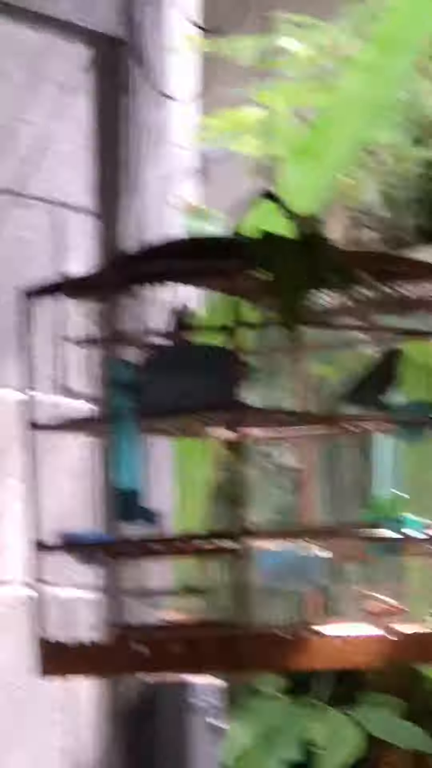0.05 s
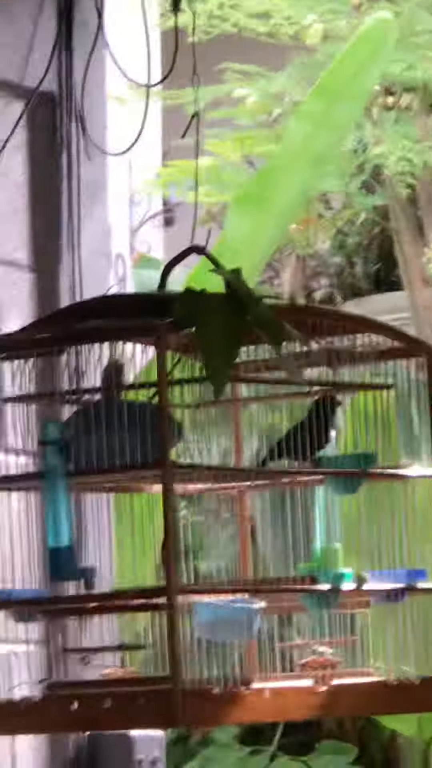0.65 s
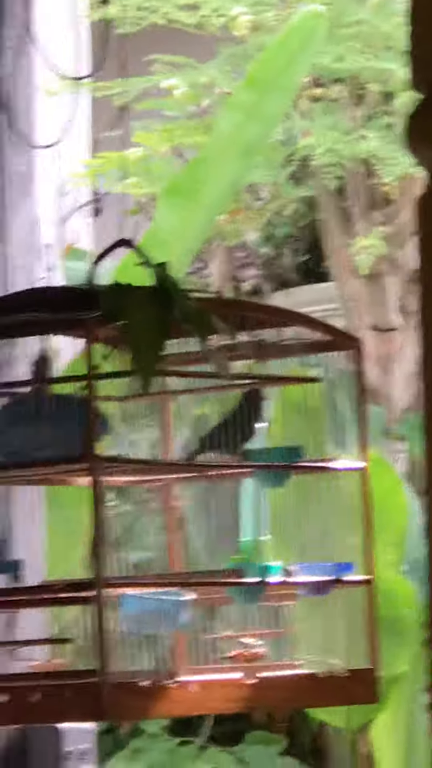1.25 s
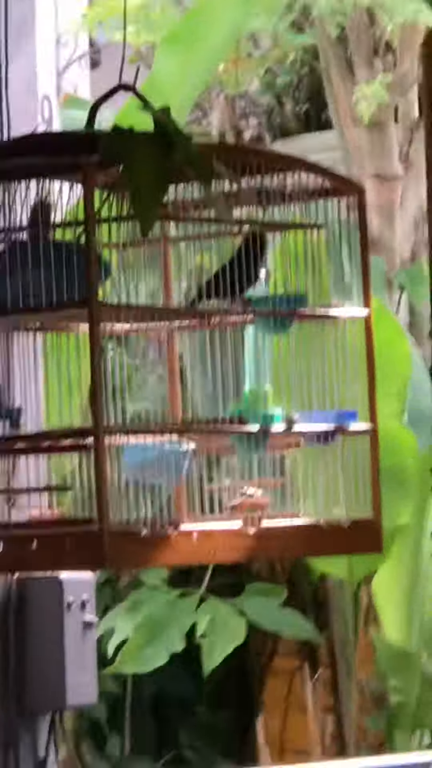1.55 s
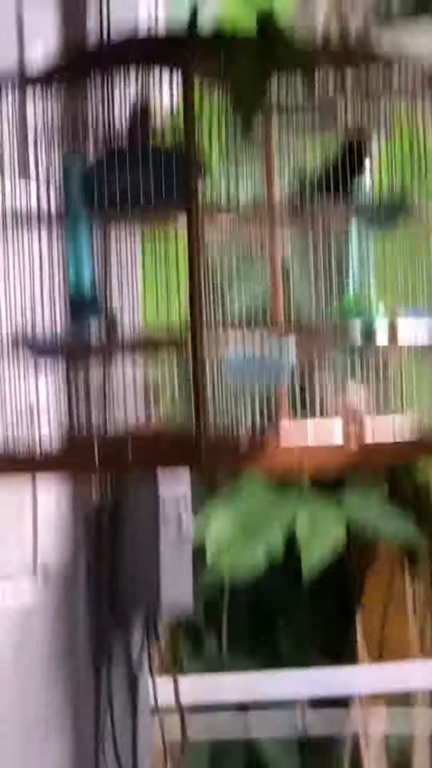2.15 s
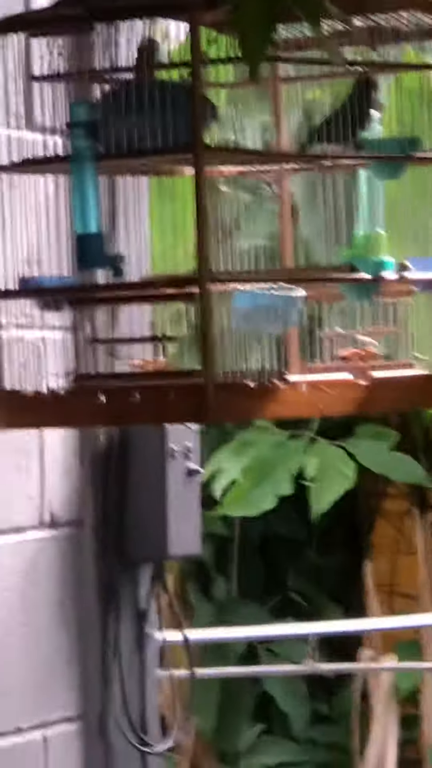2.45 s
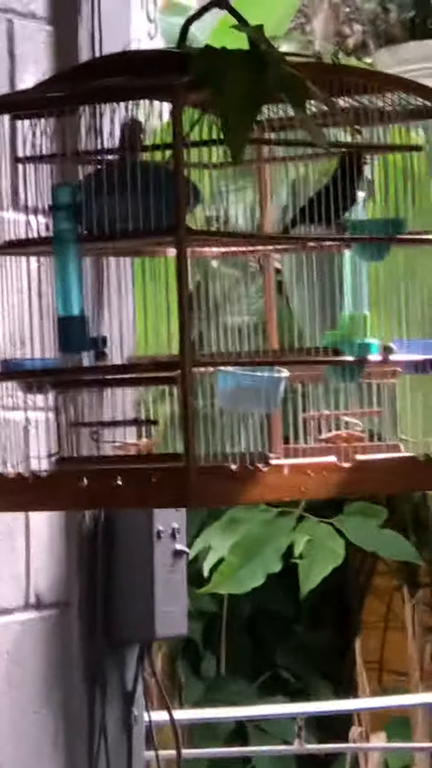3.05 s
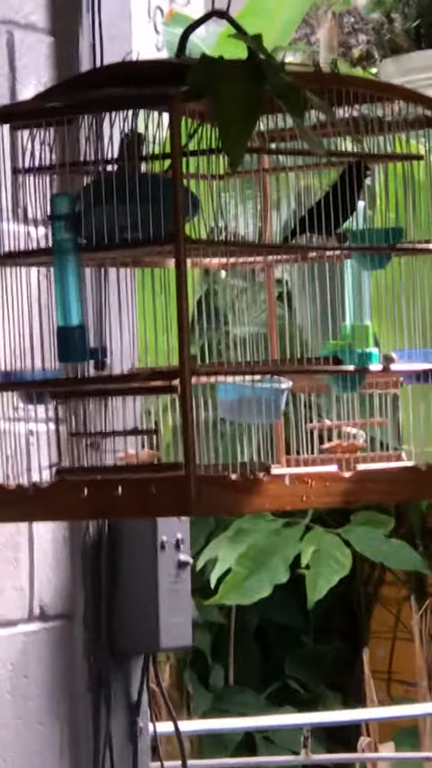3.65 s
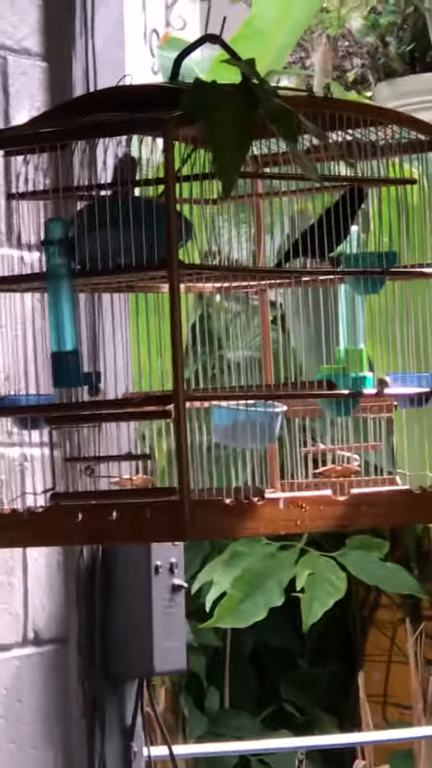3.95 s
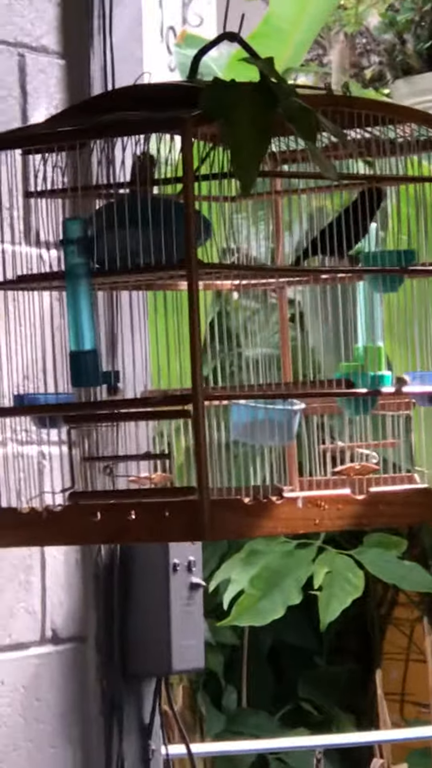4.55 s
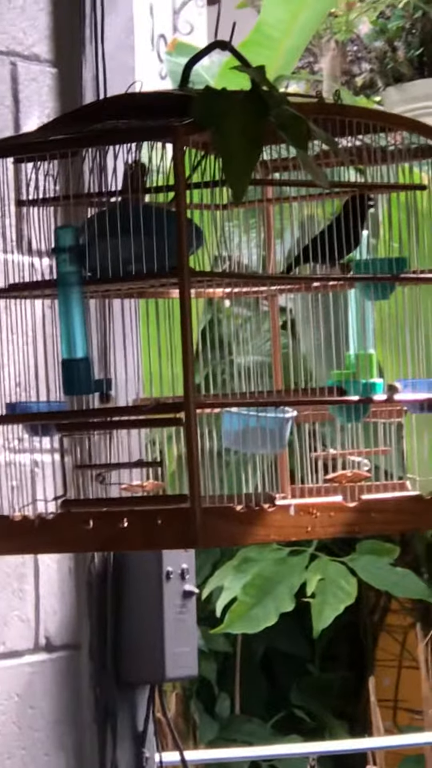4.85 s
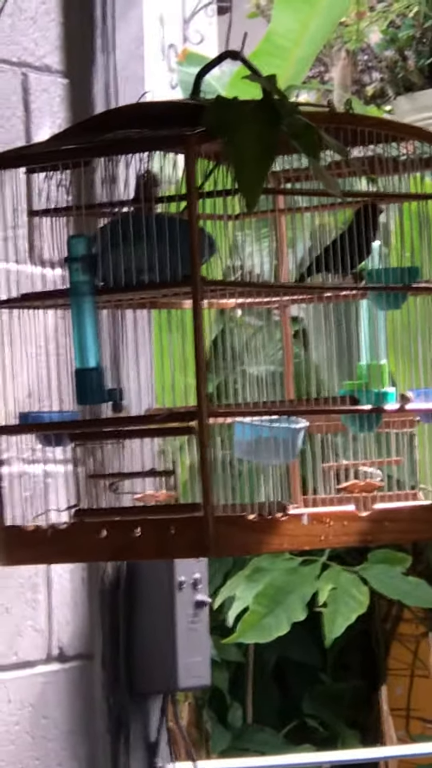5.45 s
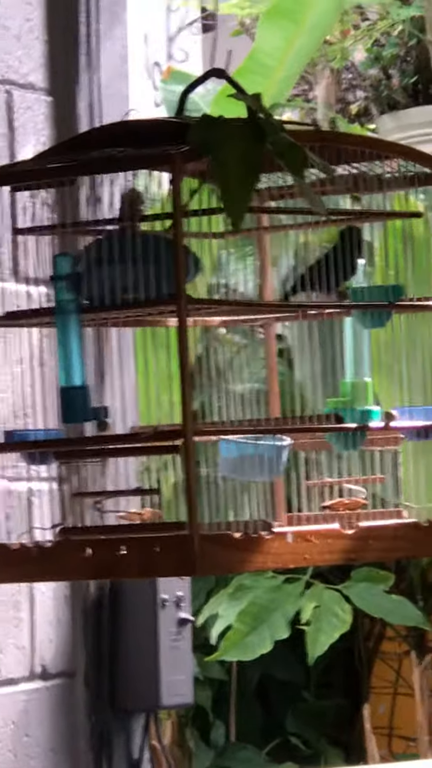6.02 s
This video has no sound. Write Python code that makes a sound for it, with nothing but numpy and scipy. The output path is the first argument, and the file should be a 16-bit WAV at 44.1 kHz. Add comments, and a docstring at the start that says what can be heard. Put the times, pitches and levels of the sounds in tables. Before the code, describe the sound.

A caged finch sings on a porch. It starts with a run of high sliding whistles that grow louder, then gives three sharp zips with arched notes, a screech, a hoarse squeak and rasping buzzes. The nearby walls add a short echo. Behind it are a faintly ticking insect, a low electrical hum and a wash of outdoor noise, with soft watery plops near the end.

```python
"""On a porch, a caged finch sings: sliding whistles, three zips with arched notes, a screech, a squeak
and four rasping buzzes. The two sides of its voice box flutter together to make the screech and buzzes.
Feathers and claws rustle in the cage, and the walls smear every note. In the garden an insect scrapes
out ticks over a faint mains hum and a wash of outdoor noise. Soft rising plops, like gurgling water,
come mostly near the end, and there are a few dull bumps."""
import sys
import numpy as np
from scipy import signal
from scipy.fft import rfft, irfft, next_fast_len
from scipy.io import wavfile
from scipy.ndimage import uniform_filter1d

SR = 44100
rng = np.random.default_rng(int(sys.argv[2]) if len(sys.argv) > 2 else 0)


def generate_wav(signal):
    """Clip the signal to [-1, 1] and save it as 16-bit WAV at the path in sys.argv[1]."""
    frames = np.transpose(np.atleast_2d(signal))
    scaled = np.clip(frames, -1, 1) * 32767
    pcm = np.round(scaled).astype(np.int16)
    wavfile.write(sys.argv[1], SR, pcm)


N = 276948
TIME = np.arange(N) / SR

# The tone colour of still air and far rumble: frequency_hz, strength_db
AIR_COLOUR = [(20, -29), (35, -1.5), (60, -3.5), (87, 4), (110, -6.5), (170, -9.5), (320, -14), (700, -22),
              (1200, -21), (2000, -29), (5000, -25), (9000, -30.5), (15500, -32)]
# The tone colour of a distant rushing: frequency_hz, strength_db
RUSH_COLOUR = [(150, -29), (350, -8), (700, 1), (1100, -1.5), (1500, -10.5), (2100, -28), (5000, -23.5)]
# How loud the rushing is over time: time_s, level_db
RUSH_LEVELS = [(0, -68.5), (.66, -70.5), (.70, -59.5), (2.0, -61), (3.4, -60.5), (4.4, -62), (5.2, -60),
               (6.28, -59.5)]
# The tones of the mains hum: pitch_hz, level_db
HUM_TONES = [(120, -61), (240, -66.5)]
# The insect's pace: time_s, chirps_so_far
CHIRP_COUNTS = [(0, 0), (1.87, 16), (5.05, 44), (6.3, 55)]
# Dull bumps: start_s, peak_db, pitch_hz, decay_s
THUDS = [(.21, -53, 327, 0.0041), (1.946, -39.5, 68.7, 0.011), (3.017, -49, 288, 0.0066),
         (4.151, -45, 83.3, 0.015)]
# Echoes off the near walls: delay_ms, gain (a minus flips the wave)
WALL_ECHOES = [(2.3, 0.081), (5.9, -0.33), (9.7, 0.5), (14.6, -0.13), (21.5, 0.39)]
# How long the porch rings: frequency_hz, time_to_fade_60_db_s
PORCH_RING = [(300, 0.089), (1200, 0.35), (2300, 0.29), (3200, 0.34), (5000, 0.32), (8000, 0.22),
              (15000, 0.16)]
# Watery plops: start_s, level_db, first_hz, last_hz, length_s
PLOP_NOTES = [(2.127, -54, 960, 1330, 0.034), (2.805, -54.5, 791, 1376, 0.044),
              (5.119, -47, 409, 1527, 0.05), (5.338, -48, 375, 1276, 0.045), (5.424, -50.5, 403, 805, 0.02),
              (5.565, -49.5, 392, 547, 0.027), (5.664, -49.5, 920, 1064, 0.033),
              (5.796, -50, 422, 1458, 0.047), (6.004, -49, 480, 1168, 0.038),
              (6.224, -58.5, 895, 1245, 0.025)]
# The tone colour of the puff that starts a deep plop: frequency_hz, strength_db
PUFF_COLOUR = [(180, -25), (340, 4), (450, 5), (700, -26), (1100, -6), (2000, -42)]
# Brief rustles in the cage: start_s, peak_db, decay_s
CAGE_RUSTLES = [(1.085, -51, 0.0041), (1.52, -43, 0.007), (2.206, -46.5, 0.012), (2.235, -41, 0.0034),
                (2.465, -65, 0.0046)]
# The tone colour of a rustle: frequency_hz, strength_db
FEATHER_COLOUR = [(1800, -25), (3200, 0), (4000, 15), (5500, -2), (9000, -24), (15000, -22)]
# A whistle's overtones at 2, 3 and 4 times its pitch, before the beak colours them: strength_db
WHISTLE_OVERTONES = [-33.5, -26, -34]
# How the open beak colours those overtones: frequency_hz, boost_db
BEAK_COLOUR = [(6000, 2), (8500, 0.5), (10400, -0.5), (12000, 3.5), (15500, 4)]
# Sliding whistles: start_s, length_s, peak_db, first_hz, target_hz, hold_s, glide_s, peak_at_share
# (a share is a part of the whole, here of the note's length: 0.5 is halfway)
SLIDING_NOTES = [(0.0, 0.017, -49, 4340, 4250, 0.0, 0.02, 0.13),
                 (0.128, 0.18, -45, 3528, 4120, 0.069, 0.099, 0.28),
                 (0.394, 0.16, -41.0, 3414, 4270, 0.059, 0.11, 0.27),
                 (0.639, 0.15, -40.5, 5060, 4154, 0.022, 0.034, 0.42),
                 (0.836, 0.21, -36.5, 5140, 3340, 0.018, 0.073, 0.5),
                 (1.09, 0.15, -38, 4480.0, 2660.0, 0.017, 0.054, 0.099),
                 (1.306, 0.14, -35.5, 4970, 2610, 0.04, 0.085, 0.88),
                 (1.45, 0.055, -42, 2930, 3518, 0.0097, 0.012, 0.67),
                 (1.519, 0.15, -36, 4430, 2675, 0.021, 0.051, 0.14),
                 (1.763, 0.053, -30, 4013, 5670, 0.022, 0.032, 0.52),
                 (1.788, 0.15, -33, 4290, 2950, 0.019, 0.061, 0.33),
                 (2.025, 0.11, -29, 3844, 4750, 0.036, 0.042, 0.46),
                 (2.254, 0.16, -37, 2730, 2949, 0.008, 0.0074, 0.31),
                 (2.493, 0.21, -31.5, 2770, 3636, 0.032, 0.061, 0.76),
                 (2.736, 0.2, -28.5, 5260, 3096, 0.0037, 0.08, 0.51),
                 (2.99, 0.18, -29.5, 4980.0, 3102, 0.0037, 0.069, 0.33),
                 (3.262, 0.17, -30, 2956, 3827, 0.053, 0.018, 0.74),
                 (3.516, 0.18, -30.5, 2932, 3890, 0.044, 0.02, 0.46),
                 (3.729, 0.12, -35, 3354, 2152, 0.0017, 0.095, 0.21)]
# Two-part calls, a sharp zip and then an arched whistle: start_s, zip_db, zip_top_hz, arch_db, arch_top_hz
ZIP_CALLS = [(3.91, -36, 6290, -33.5, 3567), (4.148, -33, 6200, -34, 3470),
             (4.379, -32.5, 5980, -34.5, 3513)]
# The path of the hoarse squeak before the buzzes: time_s, pitch_hz, level_db
SQUEAK_PATH = [(4.895, 1535, -50), (4.93, 1748, -44.5), (4.965, 1995, -56.5), (5.0, 2420, -47),
               (5.036, 2623, -43.5), (5.058, 1890, -52.5), (5.08, 1575, -45.5)]
# Rasping buzzes in a low and a high voice: start_s, length_s, low_db, low_hz, high_db, high_hz,
# flutters_per_s, low_sweep_share, high_sweep_share, rough_share (shares of pitch; a minus sweep falls)
BUZZ_NOTES = [ (5.162, 0.29, -37, 4142, -41, 6670, 26, .25, 0.43, 0.096),
              (5.536, 0.3, -39, 4150, -40.5, 6730, 69.2, 0.51, 0.56, 0.066),
              (5.904, .277, -42.5, 4003, -39, 6340, 67.7, -.7, -0.344, 0.0547),
              (6.238, .29, -37, 4500, -39, 6050, 57, -0.4, -0.31, 0.059)]
# The tone colour of the hiss in the screech and buzzes: frequency_hz, strength_db
HISS_COLOUR = [(1500, -30), (2200, 0), (2800, 10.5), (4500, 4), (5800, 3), (7300, 2), (8500, 10),
               (10300, 1.5), (12300, 14.5), (15500, 3.5)]


def gain_of(db):
    """Turns decibels into a number to multiply a sound by."""
    return 10 ** (np.asarray(db) / 20)


def evened(x):
    """Scales a signal so that its average strength (rms) is 1."""
    return x / np.sqrt(np.mean(x ** 2) + 1e-20)


def look_up(points, hz):
    """Reads a table between its frequencies, giving every octave equal room."""
    table_hz, value = np.transpose(points)
    return np.interp(np.log(hz + 1), np.log(table_hz + 1), value)


def add(mix, start_s, sound):
    """Mixes a sound in at its start time."""
    part = mix[max(round(start_s * SR), 0):][:len(sound)]
    part += sound[:len(part)]


def smooth_path(rows, size=220):
    """Gives a table's start time, then a smooth curve for each of its other columns."""
    times, *columns = np.transpose(rows)
    t = np.arange(times.min(), times.max() + .004, 1 / SR)
    return times.min(), *(uniform_filter1d(np.interp(t, times, c), size) for c in columns)


def faded(x, size=130):
    """Softens both ends of a note so that it does not click."""
    i = np.arange(len(x))
    from_edge = np.minimum(i, i[::-1])
    return x * np.sin(np.pi / 2 * np.minimum(from_edge / size, 1)) ** 2


def wander(count, hz):
    """A random drift of strength 1, mostly slower than hz."""
    size = next_fast_len(count + SR // 4)
    keep_slow = np.exp(-(np.fft.rfftfreq(size, 1 / SR) / hz) ** 2)
    return evened(irfft(rfft(rng.standard_normal(size)) * keep_slow))[:count]


def noise(colour, count=N):
    """Steady noise of strength 1 with the given tone colour."""
    size = next_fast_len(count)
    gains = gain_of(look_up(colour, np.fft.rfftfreq(size, 1 / SR)))
    return evened(irfft(rfft(rng.standard_normal(size)) * gains, size))[:count]


def hump(progress, peak_at, swell_db, fade_db, roundness=1.2):
    """A note's level swells to 0 dB and then fades, as progress runs from 0 to 1."""
    before = np.maximum(1 - progress / peak_at, 0)
    after = np.maximum(progress - peak_at, 0) / (1 - peak_at)
    return -swell_db * before ** roundness - fade_db * after ** roundness


def outdoors(air_db=-55):
    """Far rumble and air, a distant rushing, and a slightly unsteady mains hum."""
    air = gain_of(air_db + 0.2 * wander(N, 0.48)) * noise(AIR_COLOUR)
    rush_db = np.interp(TIME, *np.transpose(RUSH_LEVELS)) + 0.53 * wander(N, 60)
    rush = gain_of(rush_db) * noise(RUSH_COLOUR)
    hum = sum(gain_of(db) * evened(np.sin(2 * np.pi * hz * TIME + 0.16 * wander(N, 12.0)))
              for hz, db in HUM_TONES)
    return air + rush + hum


def insect(db=-58, peak_at=0.21, pitch_hz=6350, width_hz=400):
    """A far insect scrapes an even train of short, hissy chirps."""
    cycle = np.interp(TIME, *np.transpose(CHIRP_COUNTS)) % 1
    stroke = (cycle / peak_at * np.exp(1 - cycle / peak_at)) ** 1.9
    phase = 2 * np.pi * pitch_hz * TIME
    scrape = evened(wander(N, width_hz) * np.cos(phase) + wander(N, width_hz) * np.sin(phase))
    return gain_of(db + 0.5 * wander(N, 40)) * stroke * scrape


def bumps(rough=0.47):
    """Short, dull thuds that die after a few vibrations."""
    out, t = np.zeros(N), np.arange(SR // 4) / SR
    for start_s, db, hz, decay_s in THUDS:
        phase = 2 * np.pi * np.cumsum(hz * (1 + rough * wander(len(t), hz))) / SR
        level = gain_of(db) * t / decay_s * np.exp(1 - t / decay_s)
        add(out, start_s, level * np.sin(phase))
    return out


def porch(x, tail_db, build_s=0.016, beam_hz=11500):
    """The walls add a few single echoes, then a tail in which the lows and highs die first."""
    specks = rng.standard_normal(SR) * (rng.random(SR) < .1)  # a crowd of tiny echoes
    hz, t, bands = signal.stft(specks, SR, nperseg=256)
    dying = gain_of(-60 * t / look_up(PORCH_RING, hz)[:, None])
    tail = signal.istft(bands * dying * (1 - np.exp(-t / build_s)), SR, nperseg=256)[1]
    early = np.zeros(len(tail))
    early[0] = 1  # the sound that comes straight to the ear
    for delay_ms, gain in WALL_ECHOES:
        early[round(delay_ms * SR / 1000)] += gain
    dull = signal.lfilter(*signal.butter(2, beam_hz, fs=SR), early)  # the treble beams past the ear
    response = dull + gain_of(tail_db) * tail / np.linalg.norm(tail)
    strength = np.hypot(np.linalg.norm(early), gain_of(tail_db))
    return signal.fftconvolve(x, response / strength)[:N]


def plops(rough=0.15, puff_db=-8, puff_decay_s=0.0045, deep_below_hz=600):
    """Each plop is a ragged, hollow ring that rises as it fades; deep ones start with a low puff."""
    out = np.zeros(N)
    for start_s, db, first_hz, last_hz, length_s in PLOP_NOTES:
        progress = np.linspace(0, 1, int(length_s * SR))
        t = progress * length_s
        hz = (first_hz + (last_hz - first_hz) * progress) * (1 + rough * wander(len(t), 600))
        ring = evened(np.sin(2 * np.pi * np.cumsum(hz) / SR) * progress * np.exp(-progress / 0.36))
        puff = gain_of(puff_db) * evened(noise(PUFF_COLOUR, len(t)) * t ** 2 * np.exp(-t / puff_decay_s))
        add(out, start_s, faded(gain_of(db) * (ring + puff * (first_hz < deep_below_hz))))
    return out


def rustles():
    """Short, scratchy flicks of feathers and claws."""
    level, t = np.zeros(N), np.arange(SR // 5) / SR
    for start_s, db, decay_s in CAGE_RUSTLES:
        add(level, start_s, gain_of(db) * t / decay_s * np.exp(1 - t / decay_s))
    return level * noise(FEATHER_COLOUR)


def whistle(hz, db, waver=0.0051, waver_hz=250, flicker_db=3.5, shimmer_db=2.5, shimmer_hz=90):
    """A nearly pure tone that glides and shimmers, with faint, unsteady overtones."""
    count = len(hz)
    hz = hz * (1 + waver * wander(count, waver_hz))
    phase = 2 * np.pi * np.cumsum(hz) / SR
    tone = np.sin(phase)
    for k, overtone_db in enumerate(WHISTLE_OVERTONES, 2):
        gain = gain_of(overtone_db + look_up(BEAK_COLOUR, k * hz) + flicker_db * wander(count, 60))
        tone += gain * np.sin(k * phase) * (k * hz < SR / 2)
    return faded(gain_of(db + shimmer_db * wander(count, shimmer_hz)) * evened(tone), size=220)


def sliding_note(length_s, db, first_hz, target_hz, hold_s, glide_s, peak_at, scoop=0.0358):
    """A whistle that holds one pitch and then relaxes towards another."""
    t = np.arange(0, length_s, 1 / SR)
    still_to_go = np.exp(-(np.maximum(t - hold_s, 0) / glide_s) ** 1.335)  # the slide starts gently
    hz = target_hz + (first_hz - target_hz) * still_to_go
    hz *= 1 + scoop * np.exp(-t / 0.0184)  # the note begins a little too high
    return whistle(hz, db + hump(t / length_s, peak_at, swell_db=12.5, fade_db=8.5))


def zip_note(db, top_hz, rise_s=.012, fall_s=.022, foot_hz=3870, swell_db=23.5):
    """A rough flick up and down in pitch that grows louder to its end."""
    t = np.arange(0, rise_s + fall_s, 1 / SR)
    hz = np.interp(t, [0, rise_s, t[-1]], [foot_hz, top_hz, foot_hz])
    return whistle(hz, db - swell_db * (1 - t / t[-1]), waver=0.031, waver_hz=700)


def arch_note(db, top_hz, rise_s=.066, fall_s=.076, first_hz=2850, last_hz=2455,
              swell_db=11, fade_db=15.5):
    """A whistle that climbs to a pointed top, where it is loudest, and drops below its start."""
    t = np.arange(-rise_s, fall_s, 1 / SR)
    from_top = np.clip(np.maximum(-t / rise_s, t / fall_s), 0, 1)
    foot_hz = np.where(t < 0, first_hz, last_hz)
    hz = foot_hz + (top_hz - foot_hz) * (1 - from_top) ** 1.25
    droop_db = np.where(t < 0, swell_db * from_top, fade_db * from_top ** 2)
    return whistle(hz, db - droop_db, waver=0.0058)


def squeak(rough=0.029, throat_hz=2900, throat_width_hz=1300, beak_share=0.54):
    """A low, hoarse note whose overtones slide through the pitch at which the throat rings."""
    start_s, hz, db = smooth_path(SQUEAK_PATH)
    phase = 2 * np.pi * np.cumsum(hz * (1 + rough * wander(len(hz), 370))) / SR
    k = np.arange(1, 4)[:, None]  # 1, 2 and 3 times the pitch
    weight = 1 / (1 + (2 * (k * hz - throat_hz) / throat_width_hz) ** 2)
    weight += beak_share * ((k * hz > 2300) & (k * hz < 4500))  # the open beak lets this band through
    tone = (weight * np.sin(k * phase)).sum(0) / np.linalg.norm(weight, axis=0)
    return start_s, faded(gain_of(db) * evened(tone))


def fluttering_voice(db, hz, beat, sweep, rough, build_s, rough_hz, throb, tilt_db=5):
    """One ragged voice swells and dies on every beat; if its pitch sweeps, the high end is louder."""
    ramp = uniform_filter1d(beat - .5, 70)
    build = 1 - np.exp(-np.arange(len(db)) / (build_s * SR))  # the flutter takes a moment to start
    pitch_hz = hz * (1 + build * (sweep * ramp + rough * wander(len(db), rough_hz)))
    tone = np.sin(2 * np.pi * np.cumsum(pitch_hz) / SR) * gain_of(tilt_db * np.sign(sweep) * ramp)
    return gain_of(db) * evened(tone * (1 - throb * np.cos(2 * np.pi * beat)))


def two_voices(low_db, low_hz, high_db, high_hz, flutter, build_s, hiss_db=-8.5, uneven=.07):
    """Both sides of the bird's voice box flutter together, with a puff of hiss on each beat."""
    flutters_per_s, low_sweep, high_sweep, rough = flutter
    beat = np.cumsum(flutters_per_s * (1 + uneven * wander(len(low_db), 30))) / SR % 1
    low = fluttering_voice(low_db, low_hz, beat, low_sweep, rough, build_s, rough_hz=388, throb=0.26)
    high = fluttering_voice(high_db, high_hz, beat, high_sweep, rough, build_s, rough_hz=437, throb=0.6)
    airflow = np.hypot(gain_of(high_db), gain_of(low_db - 9))  # the low voice hisses less
    puffs = 1 - 0.69 * np.cos(2 * np.pi * beat)
    hiss = gain_of(hiss_db) * airflow * noise(HISS_COLOUR, len(beat)) * puffs
    beak = signal.butter(2, 1750, "high", fs=SR, output="sos")  # so small a beak sends out no low tones
    return faded(signal.sosfilt(np.vstack([beak, beak]), low + high + hiss))


def screech(length_s=0.19, swell_db=7, push_db=5.5, push_s=0.012, fade_in_s=0.031, close_s=.048):
    """The two voices close in on each other; the high one fades in as it drops."""
    t = np.arange(1, length_s * SR) / SR
    low_db = -36.5 - swell_db * (1 - t / length_s)
    low_db += push_db * np.exp(-(t / push_s) ** 2)  # a hard first push
    high_db = -43.5 + 20 * np.log10(1 - np.exp(-(t / fade_in_s) ** 2))
    apart = np.exp(-(t / close_s) ** 2)
    low_hz, high_hz = 4440 - 121 * apart, 6640 + 1850 * apart
    flutter = (51, -.5, 0, .052)  # flutters_per_s, low_sweep_share, high_sweep_share, rough_share
    return two_voices(low_db, low_hz, high_db, high_hz, flutter, build_s=0.031)


def buzz(length_s, low_db, low_hz, high_db, high_hz, *flutter, turn_at=.55, low_sag=.3, high_sag=.15):
    """The high voice leads; as it dies away, the low one takes over and sags in pitch."""
    progress = np.linspace(0, 1, int(length_s * SR))
    late = np.maximum(progress - turn_at, 0) / (1 - turn_at)
    low_db = low_db + hump(progress, peak_at=0.79, swell_db=10.5, fade_db=6.5)
    high_db = high_db + hump(progress, peak_at=0.23, swell_db=7, fade_db=0) - 27 * late
    low_hz, high_hz = low_hz * (1 - low_sag * late), high_hz * (1 - high_sag * progress)
    return two_voices(low_db, low_hz, high_db, high_hz, flutter, build_s=0.0081)


def finch(arch_delay_s=.048, screech_start_s=4.626):
    """The whole song: sliding whistles, three two-part calls, a screech, a squeak and buzzes."""
    song = np.zeros(N)
    for start_s, *note in SLIDING_NOTES:
        add(song, start_s, sliding_note(*note))
    for start_s, zip_db, zip_hz, arch_db, arch_hz in ZIP_CALLS:
        add(song, start_s, zip_note(zip_db, zip_hz))
        add(song, start_s + arch_delay_s, arch_note(arch_db, arch_hz))
    add(song, screech_start_s, screech())
    add(song, *squeak())
    for start_s, *note in BUZZ_NOTES:
        add(song, start_s, buzz(*note))
    return song


def scene():
    """The bird and the plops echo in the porch, over the bumps and the sounds of the garden."""
    bird = porch(finch() + rustles(), tail_db=-2)
    gurgle = porch(plops(), tail_db=-4.5)
    return (bird + gurgle + bumps() + insect() + outdoors())[None]


def record(dry):
    """Cuts away the very highest treble, above 15800 Hz."""
    treble_cut = signal.firwin(511, 15800, window=("kaiser", 9), fs=SR)
    return signal.oaconvolve(dry, treble_cut[None], "same")


dry = scene()
out = record(dry)
generate_wav(out)
```